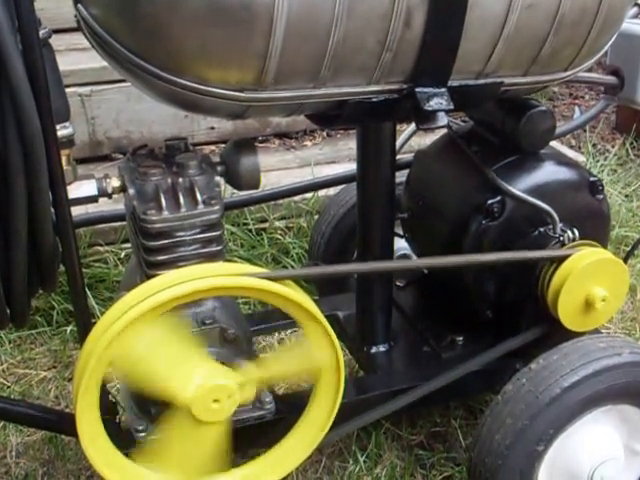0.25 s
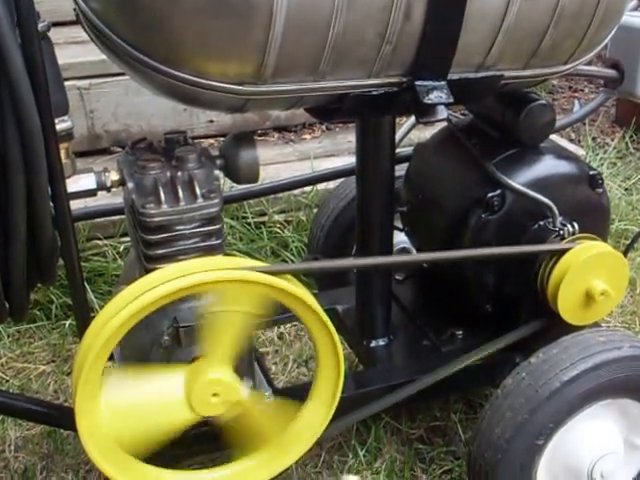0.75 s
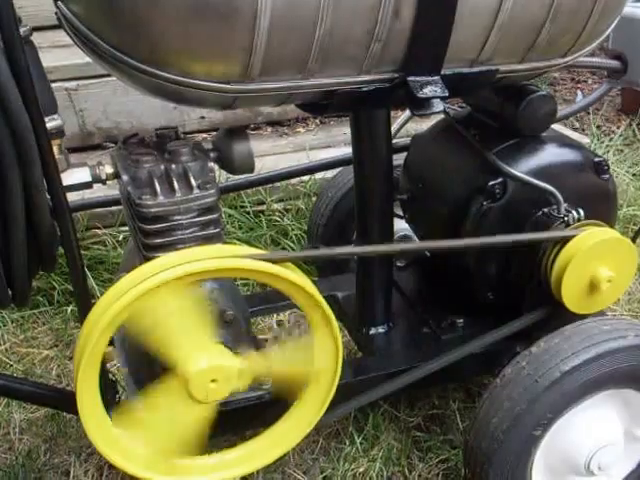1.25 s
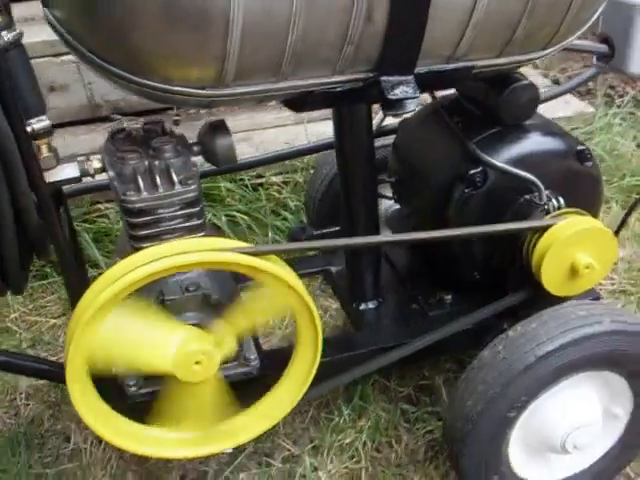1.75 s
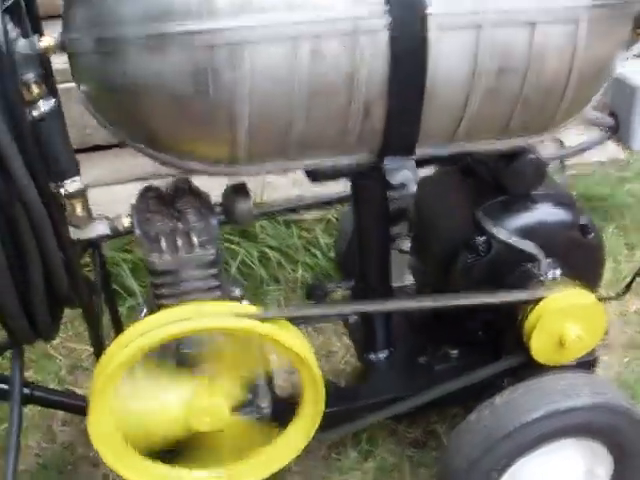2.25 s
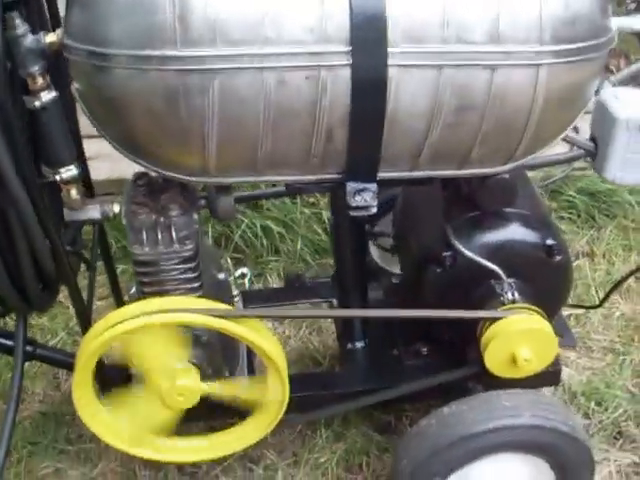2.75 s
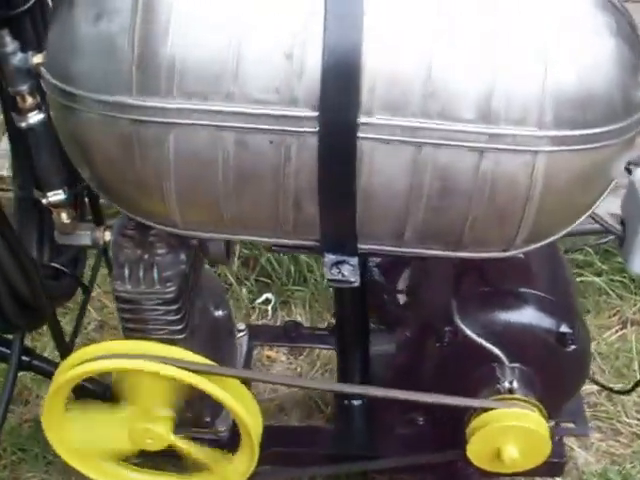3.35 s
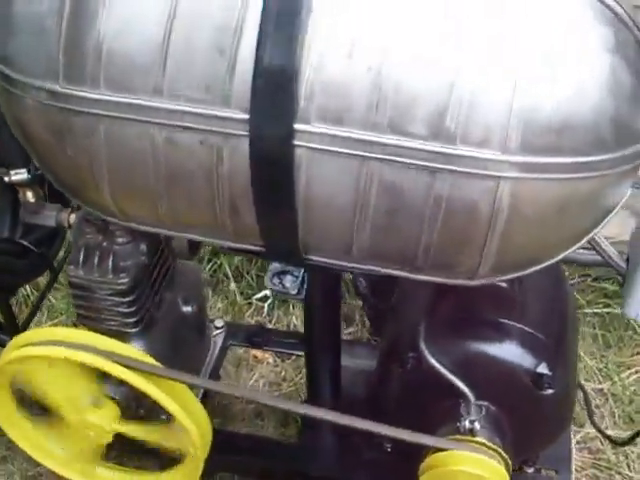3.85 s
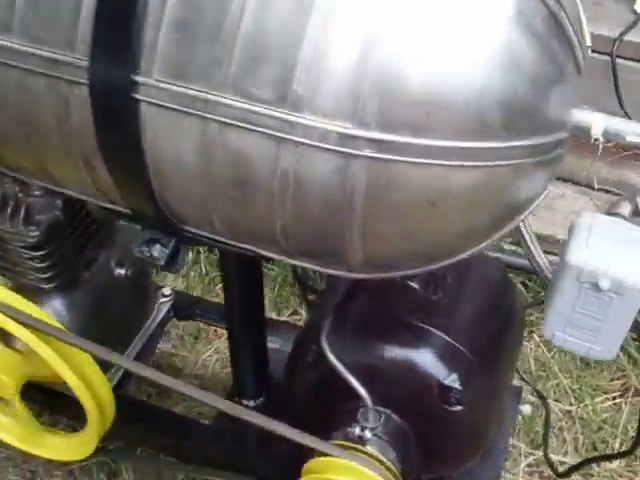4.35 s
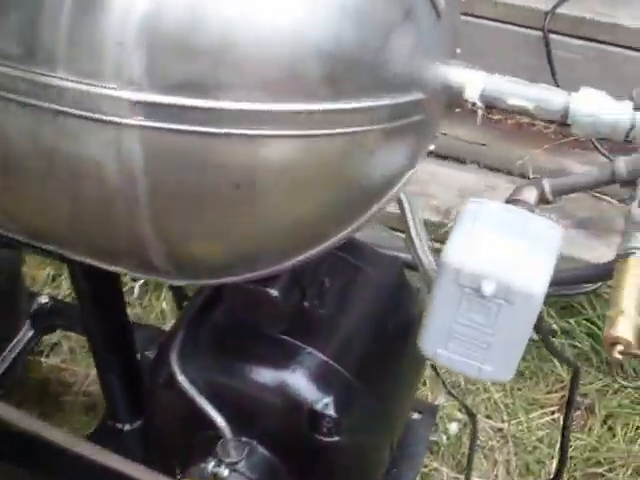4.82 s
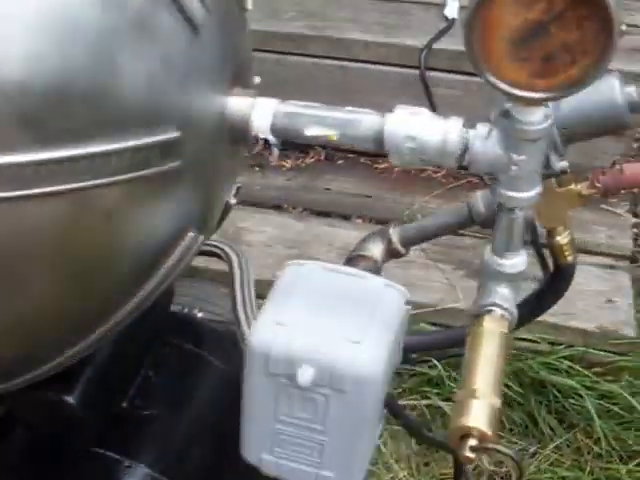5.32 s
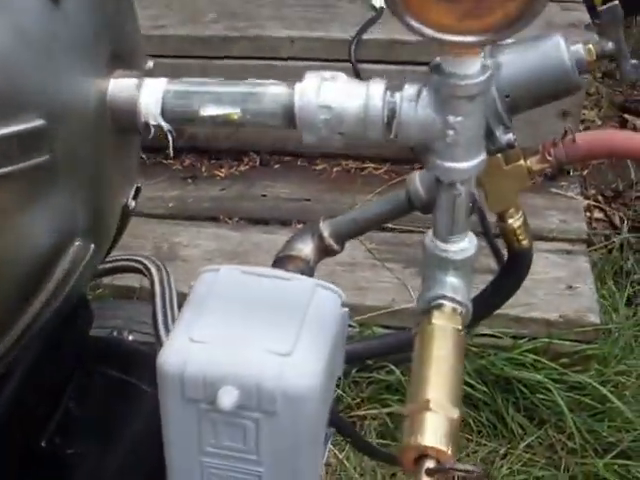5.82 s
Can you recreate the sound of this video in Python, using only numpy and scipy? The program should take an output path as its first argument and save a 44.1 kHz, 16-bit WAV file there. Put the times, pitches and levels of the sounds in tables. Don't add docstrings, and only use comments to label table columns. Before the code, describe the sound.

Roaring jet of escaping air stops dead, then a piston compressor chugs rapidly with belt squeaks, valve pops and a faint leak.

```python
import sys
import numpy as np
from scipy import signal
from scipy.io import wavfile
from scipy.ndimage import uniform_filter1d

SR = 44100
rng = np.random.default_rng(int(sys.argv[2]) if len(sys.argv) > 2 else 0)


def voltage_ratio(level):
    return 10 ** (np.asarray(level, float) / 20)


def dump(signal):
    limited = np.clip(np.atleast_2d(signal).T, -1, 1)
    pcm = np.round(limited * 32767).astype(np.int16)
    wavfile.write(sys.argv[1], SR, pcm)


N = 268128
TIME = np.arange(N) / SR
STROKES_PER_S = 16.272
SHUT_S = 1.1175


def rms_one(x):
    return x / np.sqrt(np.mean(x ** 2) + 1e-20)


def in_time(rows):
    s, *columns = np.transpose(rows)
    return [np.interp(TIME, s, column) for column in columns]


def drift(rate_hz):
    r = np.exp(-80 * np.pi * rate_hz / SR)
    chance = rng.standard_normal(N // 40 + 2002)
    slow = signal.lfilter([1], [1, -2 * r, r * r], chance)[2000:]
    return np.interp(np.arange(N) / 40, np.arange(len(slow)), rms_one(slow))


def ring(push, hz, t60):
    r = voltage_ratio(-60 / (t60 * SR))
    w = 2 * np.pi * hz / SR
    return signal.lfilter([0, np.sin(w)], [1, -2 * r * np.cos(w), r * r], push + 1e-18)


def resonance(x, hz, width_hz):
    r = np.exp(-np.pi * width_hz / SR)
    w = 2 * np.pi * hz / SR
    return signal.lfilter([(1 - r * r) / 2, 0, (r * r - 1) / 2], [1, -2 * r * np.cos(w), r * r], x)


def coloured(spectrum, patchy_db):
    hz, level_db = np.transpose(spectrum)
    octaves = np.log2(min(hz[-1], 14000) / hz[0])
    edges = hz[0] * 2 ** np.arange(0, octaves + 0.3, 1 / 3)
    together = drift(5.8)
    white = rng.standard_normal((2, N))
    out = 0
    for k, (low, high) in enumerate(zip(edges, edges[1:])):
        band_filter = signal.butter(2, [low, high], "band", fs=SR, output="sos")
        band = signal.sosfilt(band_filter, white[k % 2])
        band_db = np.interp(np.log(low * high) / 2, np.log(hz), level_db)
        flicker_db = patchy_db * (0.36 * together + drift(20.0))
        out = out + band * voltage_ratio(band_db + flicker_db)
    return rms_one(out)


def heard_db(levels_db, place):
    return np.interp(place, np.arange(len(levels_db)), levels_db)


def looped(ms, level_db, uneven_db):
    luck = rng.standard_normal((50, 2))
    s = 2 * np.arange(50) / STROKES_PER_S + ms / 1000 + 0.00012 * luck[:, 0]
    clicks = np.zeros(N + SR)
    clicks[(SR * s).astype(int)] = voltage_ratio(level_db + uneven_db * luck[:, 1])
    return clicks[:N]


# time in seconds, level in dB.
JET_LEVEL = [(0.0, -11.5), (0.492, -12), (1.1, -12.5)]
# pitch in Hz, level in dB per Hz.
JET_COLOUR = [(24, -50), (40, -16), (409, -8.5), (483, -12), (796, -4.5), (1920, -9.5), (3080, -5.5),
              (5310, -4.5), (6900, -2), (10300, -3), (11600, -19.5), (15100, -50), (22000, -120)]
# pitch in Hz, width in Hz, level in dB.
NOZZLE_TONES = [(2380, 62, -5), (3115, 200, 1), (3760, 150, -4.5), (4300, 210, 0), (5000, 220, -16),
                (5840, 210, -9), (6760, 790, -0.5), (8500, 230, -7), (10240, 470, 3.5)]


def jet():
    rush = coloured(JET_COLOUR, patchy_db=0.5)
    nozzle = sum(voltage_ratio(level_db) * resonance(rush, hz, width_hz) for hz, width_hz, level_db in NOZZLE_TONES)
    hiss = rms_one(0.91 * rush + nozzle)
    after = np.clip(TIME - SHUT_S, 0, None)
    closing = 0.92 * voltage_ratio(-60 * after / 0.013)
    bleeding = 0.12 * voltage_ratio(-60 * after / 0.22)
    return voltage_ratio(in_time(JET_LEVEL)[0]) * (closing + bleeding) * hiss


# pitch in Hz, level in dB per Hz.
YARD_COLOUR = [(18, -68), (30, -28), (155, -5), (238, -21), (467, 4), (716, -13.5), (960, -8),
               (1440, -26.5), (1760, -23), (2890, -14), (4850, -30.5), (5680, 0), (6500, -29), (8450, -57),
               (14300, -120)]


def yard():
    return voltage_ratio(-38.5) * coloured(YARD_COLOUR, patchy_db=3.0)


# pitch in Hz, level in dB per Hz.
LEAK_COLOUR = [(2650, -37), (4500, -14), (4890, -8.5), (5450, -4.5), (5780, -4), (6280, -13.5),
               (7020, -9.5), (10500, -10.5), (11000, -9.5), (11600, -28), (15100, -54), (22000, -120)]


def belt_leak(leak_db):
    turn = (TIME * STROKES_PER_S - 0.48) * 2 * np.pi
    tight = voltage_ratio(9.0 * (np.cos(turn) - 1) + 2.4 * drift(12.0))
    hiss = coloured(LEAK_COLOUR, patchy_db=0.6)
    hiss *= voltage_ratio(2.9 * drift(150.0))
    rub = resonance(hiss, 4400, 400) + voltage_ratio(5.0) * resonance(hiss, 10430, 1000)
    whistle = voltage_ratio(-6.0 + 7.1 * drift(4.8)) * resonance(hiss, 7900, 400)
    return voltage_ratio(leak_db + 1.0) * (hiss + tight * rub + whistle)


# ms into the pair of strokes, level in dB.
VALVE_POPS = [
    (52.4, -20),
    (56.9, -30.5),
    (113.0, -21),
    (117.5, -26.5),
]
# pitch in Hz, width in Hz, then dB at flywheel, tank side, tank end.
AIR_COLUMN = [(160, 69.5, -16, -19, -18), (463.3, 229, 0.5, 1.5, 2.9), (897, 136, -22, -11, -12)]


def pops(place):
    clicks = sum(looped(ms, level_db, uneven_db=1.3) for ms, level_db in VALVE_POPS)
    out = np.zeros(N)
    for hz, width_hz, *levels_db in AIR_COLUMN:
        swing = clicks
        for _ in range(3):
            swing = resonance(swing, hz, width_hz)
        out += voltage_ratio(heard_db(levels_db, place)) * swing * SR / (1.7 * width_hz)
    return out


# ms into the pair of strokes, level in dB, hardness in Hz.
KNOCKS = [(2.55, -7.5, 860), (33.08, -11, 1600), (39.5, -10, 1500), (44.51, -3, 590), (50.54, -1.5, 750),
          (55.05, -2.5, 440), (64.26, -3, 390), (93.9, -6, 1240), (100.34, -10.5, 1250), (104.3, -3, 1200),
          (109.7, 1.5, 1630), (115.5, -1.5, 670)]
# pitch in Hz, ring time t60 in seconds,
# then dB at flywheel, tank side, tank end.
BODY_TONES = [(112.2, 0.11, -20.5, -24, -20.5), (165.5, 0.028, -9, -16.5, -13.5),
              (320.6, 0.068, -14, -14, -11.5), (353.8, 0.088, -6.5, -11.5, -8), (404.7, 0.1, -33, -3.5, -2),
              (463.7, 0.064, -10, -6, -3), (501.6, 0.029, -10, -13.5, -3), (592.5, 0.046, -6, -3.5, -23.5),
              (633.4, 0.09, -6, -9, -24), (704, 0.051, -8, -19, -21), (801.5, 0.13, -13, -7, -11.5),
              (871.7, 0.22, -19, -3, -5), (903.4, 0.046, -16, -3.5, -20), (952, .16, -12.5, -6, -16.5),
              (1023, 0.31, -27, -29, -19), (1060, 0.6, -18, -30, -42), (1230, 0.062, -18, -31.5, -25)]
THUMP_LEVELS = [-34.5, -29.5, -28.5]


def thumps(place):
    force = 0
    for ms, level_db, hard_hz in KNOCKS:
        soften = signal.butter(2, hard_hz, fs=SR)
        force = force + signal.lfilter(*soften, looped(ms, level_db, uneven_db=0.8))
    force = rms_one(force)
    out = np.zeros(N)
    for hz, t60, *levels_db in BODY_TONES:
        rattle = voltage_ratio(-18) * 4 * rng.standard_normal(N)
        drive = force * voltage_ratio(0.72 * drift(10.5)) + rattle
        drive = resonance(drive, hz, 60 + 0.12 * hz)
        out += voltage_ratio(heard_db(levels_db, place)) * rms_one(ring(drive, hz, t60))
    power = uniform_filter1d(out ** 2, SR // 3, mode="reflect")
    return voltage_ratio(heard_db(THUMP_LEVELS, place) - 2.5) * out / np.sqrt(power)


# pitch in Hz, width in Hz, then dB at flywheel, tank side, tank end.
INTAKE_TONES = [(2051, 96, -11.5, -6.5, -8), (2303, 276, -3, -12, -7.5), (2576, 240, -13, 1.5, -3.5),
                (2848, 126, -7.5, -3, 0.5), (3076, 220, -0.5, -1, -6), (3320, 59, -8, 0, 0),
                (3553, 137, -4.5, -1.5, -8), (4275, 450, -11.5, -4, -9.5)]
CHUFF_LEVELS = [-37, -41.5, -36.5]


def chuff(place):
    turn = (TIME * STROKES_PER_S + 0.15) % 1
    rise = 1 - np.exp(-(turn / 0.075) ** 2.0)
    fall = np.exp(-(turn / 0.58) ** 3.6)
    suction = 0.28 + 1.6 * rise * fall * voltage_ratio(0.46 * drift(30.0))
    grit_db = 2.3 * rng.standard_normal(N // 40 + 1).repeat(40)[:N]
    air = suction * rng.standard_normal(N) * voltage_ratio(grit_db)
    out = np.zeros(N)
    for k, (hz, width_hz, *levels_db) in enumerate(INTAKE_TONES):
        once = resonance(air, hz, 1.6 * width_hz)
        twice = resonance(once, hz, 1.6 * width_hz)
        out += (-1) ** k * voltage_ratio(heard_db(levels_db, place) + 1.6 * drift(5.5)) * twice
    return voltage_ratio(heard_db(CHUFF_LEVELS, place)) * rms_one(out)


GRIP_LOSS = [-12, 26.5, .463, 31.5, .457, 9.9, .605]
SLIP_DELAY = [29.2, 2, .2, 1.5, 0.11, .3, 0.023]
SLIP_PITCH = [5700, 22, .18, 67, -.11, 125, .49]
SLIP_LENGTH = [10.8, 1.6, .05, 1.9, .01, .6, .52]
PITCH_GLIDE = [-9, 20, -.26, 14, -.4, 4, -.11]
# loss in dB, delay in ms, pitch in Hz, length in ms, glide in kHz per second.
SLIP_SCATTER = [1.3, 1.0, 55, 2.0, 12]
SQUEAK_LEVELS = [-24.5, -22.5, -25]


def belt_slips(place):
    belt_lap, pulley_beat = 0.1382, 0.4294
    knee_db = 3
    stroke = np.arange(99)
    turns = np.outer(stroke, [belt_lap, pulley_beat, pulley_beat - belt_lap])
    rules = np.array([GRIP_LOSS, SLIP_DELAY, SLIP_PITCH, SLIP_LENGTH, PITCH_GLIDE])
    swings = [rule[0] + np.cos(2 * np.pi * (turns - rule[2::2])) @ rule[1::2] for rule in rules]
    grip_db = -knee_db * np.logaddexp(0, swings[0] / knee_db)
    swings[0] = np.maximum(grip_db, -17)
    scatter = SLIP_SCATTER * rng.standard_normal((99, 5))
    loss_db, late_ms, hz, ms, glide = np.array(swings) + scatter.T
    s = stroke / STROKES_PER_S + late_ms / 1000
    level_db = heard_db(SQUEAK_LEVELS, place[(s * SR).astype(int)]) + loss_db
    level_db -= 22 * np.exp(-((s - SHUT_S - 0.08) / 0.03) ** 2)
    return list(zip(s, level_db, hz, np.clip(ms, 4, 26), glide))


OCTAVE_LEVELS = [-22, -19, -10]
# pitch in Hz, level in dB, ring time t60 in seconds.
SHELL_TONES = [(5060, 6, 0.26), (5535, -3, 0.15), (5770, 4.5, 0.15), (5850, -4, 0.22), (6060, -27, 0.15)]


def squeaks(place):
    wobble, flutter = drift(167.0), drift(120.0)
    grit = rng.standard_normal(N)
    rough = rms_one(signal.lfilter([1], [1, -1.9, 0.9025], grit))
    crisp = signal.lfilter(*signal.butter(2, 4800, "high", fs=SR), grit)
    slips = belt_slips(place)
    lucks = rng.standard_normal((len(slips), 2))
    out = np.zeros(N)
    for (s, level_db, hz, ms, glide), luck in zip(slips, lucks):
        half = ms / 2000
        part = slice(int((s - 1.9 * half) * SR), int((s + 1.6 * half) * SR))
        u = (TIME[part] - s) / half
        pitch = hz + 1000 * glide * half * np.clip(u, -1, 1)
        pitch -= np.where(u < 0, 130, 260) * u ** 4
        pitch += 120 * wobble[part]
        pitch += 9.1 * ms * (0.3 - u ** 2)
        phase = 2 * np.pi * np.cumsum(pitch) / SR
        held = 1 / (1 + np.exp((np.abs(u) - 1.02) * ms * 1.3))
        fringe = 0.12 * np.clip((u + 1.9) * (1.6 - u), 0, 1)
        swell = voltage_ratio(level_db + 3.8 * flutter[part]) * (held + fringe)
        octave_db = heard_db(OCTAVE_LEVELS, place[part]) + 3.8 * luck[0] + 1.7 * u
        octave = voltage_ratio(octave_db) * (0.47 + 0.8 * rough[part])
        tick_shape = np.exp(-((u - 1.2) * half / 0.0008) ** 2)
        tick = voltage_ratio(level_db - 7 + 4.5 * luck[1]) * tick_shape * crisp[part]
        out[part] += swell * (np.sin(phase) + octave * np.sin(2 * phase)) + tick
    shell = sum(voltage_ratio(level_db - 57.5) * ring(out, hz, t60) for hz, level_db, t60 in SHELL_TONES)
    return out + shell


# start in seconds, level in dB, pitch in Hz, ring time t60 in seconds,
# share of noise from 0 to 1.
LOOSE_KNOCKS = [
    (1.5371, -13, 7100, 0.016, 0.71),
    (1.5456, -17.5, 2420, 0.011, 0.65),
    (1.5524, -16, 5600, 0.017, 0.65),
    (2.6871, -5, 1760, 0.0094, 0.42),
    (2.688, -9, 1040, 0.018, 0.79),
    (2.775, -24, 1790, .012, .8),
]


def snaps():
    out = np.zeros(N)
    for s, level_db, hz, t60, noisy in LOOSE_KNOCKS:
        after = np.clip(TIME - s, 0, None)
        burst = (TIME >= s) * voltage_ratio(level_db - 60 * after / t60)
        dull = signal.butter(1, min(2.4 * hz, 12000), fs=SR)
        crack = rms_one(signal.lfilter(*dull, rng.standard_normal(N)))
        tone = np.sin(2 * np.pi * hz * after)
        out += burst * ((1.1 - noisy) * tone + 0.58 * noisy * crack)
    return signal.lfilter(*signal.butter(2, 550, "high", fs=SR), out)


def channels_part(hiss):
    band = signal.butter(6, [7600, 9700], "band", fs=SR, output="sos")
    treble = signal.sosfilt(band, np.roll(hiss, 900))
    moment = np.clip(1 - ((TIME - 0.743) / 0.02) ** 2, 0, 1)
    return voltage_ratio(-5.5) * moment * treble * [[1], [-1]]


# time in seconds, place (0 flywheel, 1 beside the tank, 2 tank end),
# level of the leak in dB.
LISTENER_WALK = [
    (1.1, .01, -53),
    (1.5, 0.011, -58),
    (2.0, 0.15, -56),
    (2.5, 0.3, -48),
    (3.5, .88, -49.5),
    (4.3, 1.2, -47.5),
    (4.7, 2.06, -47),
    (5.2, 2.7, -46.5),
    (5.6, 1.58, -45.5),
    (6.08, 1.8, -45.5),
]


def scene():
    place, leak_db = in_time(LISTENER_WALK)
    hiss = jet()
    air = yard() + belt_leak(leak_db)
    machine = pops(place) + thumps(place) + chuff(place) + squeaks(place)
    lag = int(0.0085 * SR)
    machine[lag:] += voltage_ratio(-15) * machine[:-lag]
    return machine + snaps() + air + hiss + channels_part(hiss)


def low_pass(x):
    return signal.sosfilt(signal.butter(12, 11780, fs=SR, output="sos"), x)


def record(dry):
    rounded = 1.239 * np.tanh(dry / 1.367)
    top_cut = signal.cheby2(20, 62, 11800, fs=SR, output="sos")
    mix = signal.sosfilt(top_cut, rounded)
    return low_pass(mix)


dry = scene()
out = record(dry)
dump(out)
```